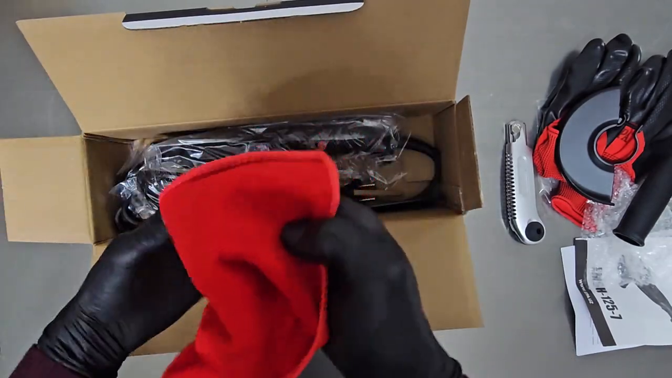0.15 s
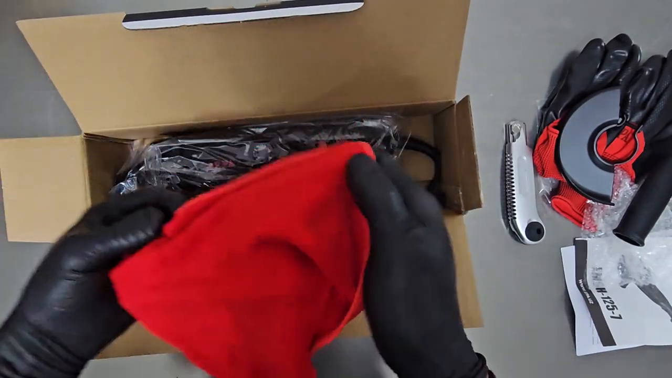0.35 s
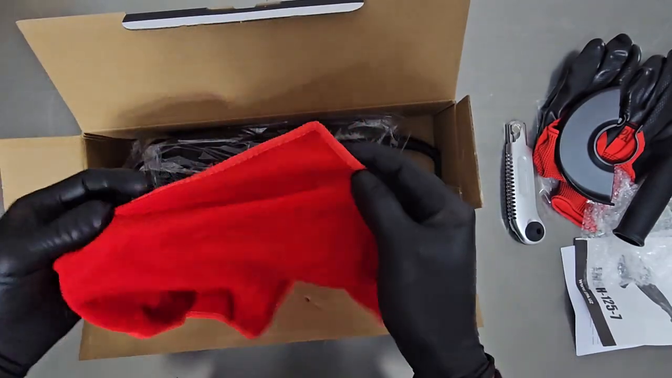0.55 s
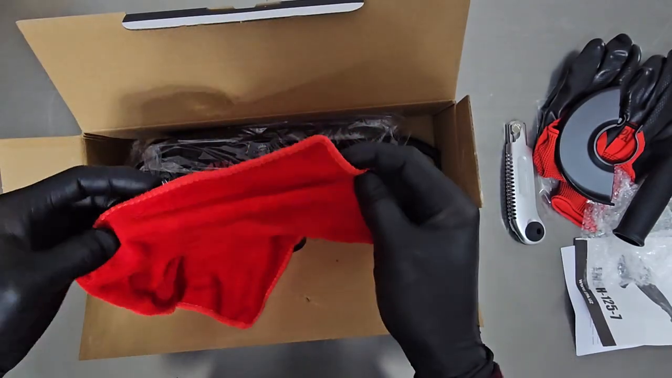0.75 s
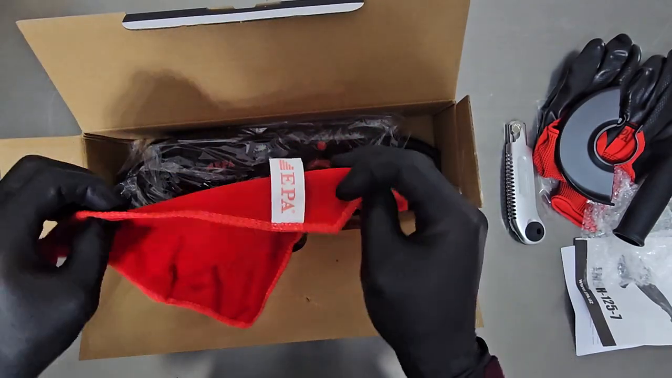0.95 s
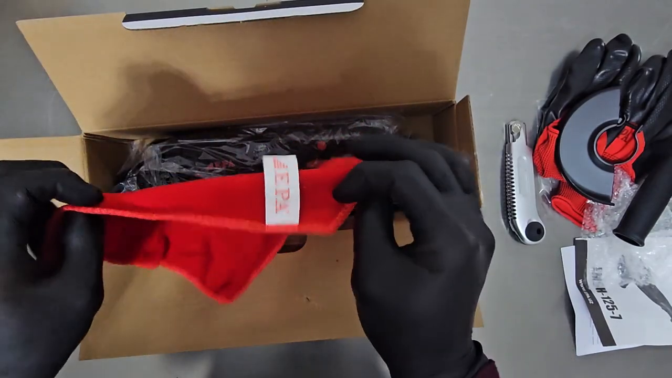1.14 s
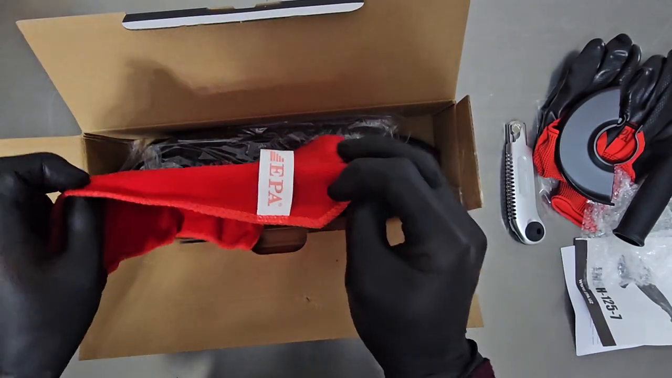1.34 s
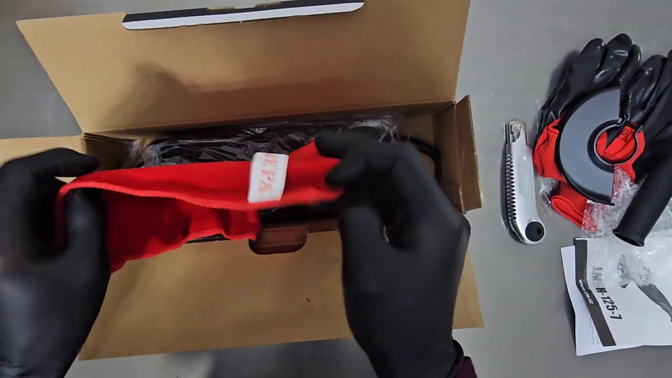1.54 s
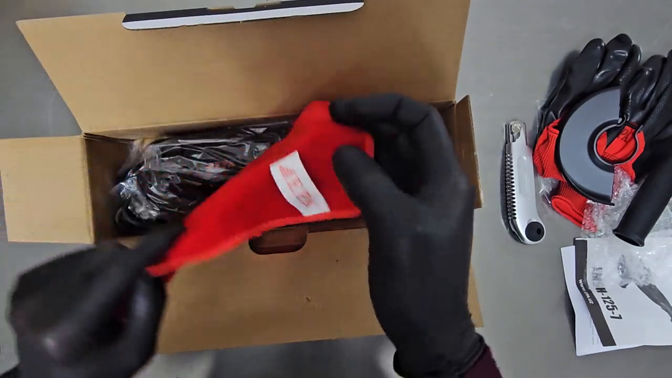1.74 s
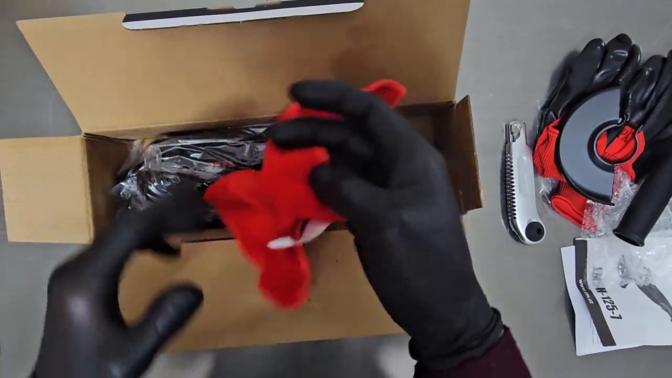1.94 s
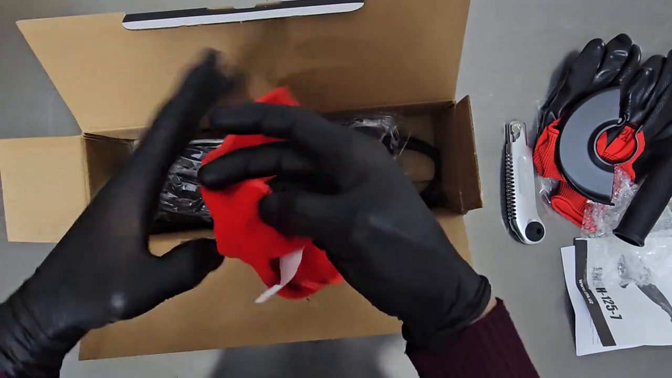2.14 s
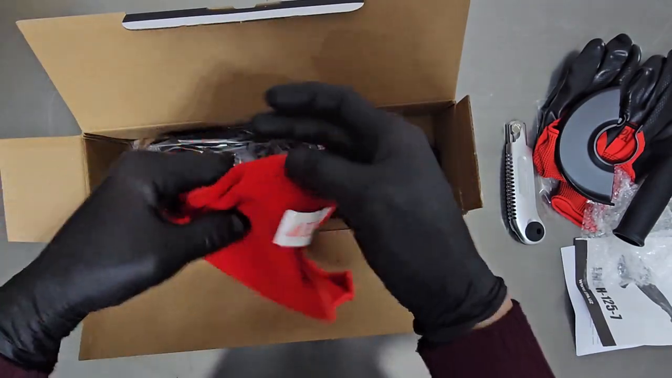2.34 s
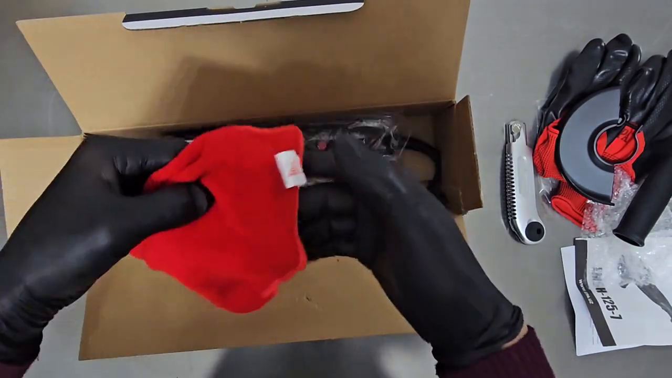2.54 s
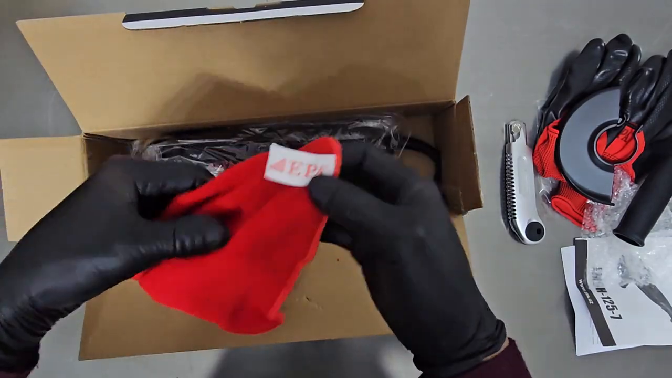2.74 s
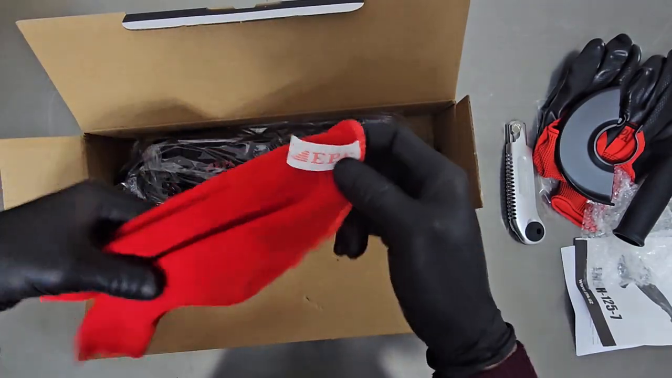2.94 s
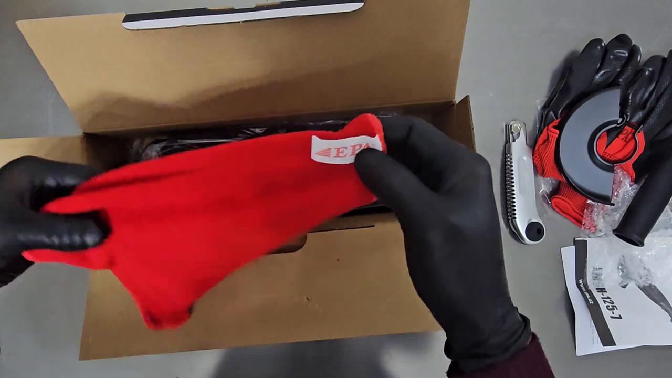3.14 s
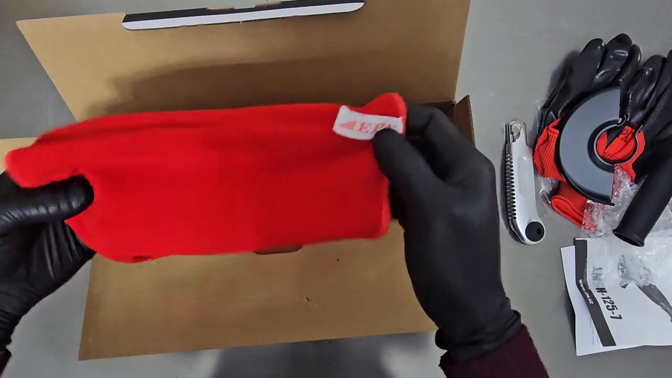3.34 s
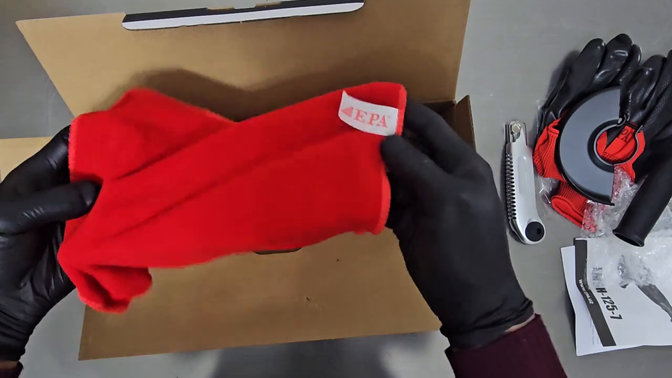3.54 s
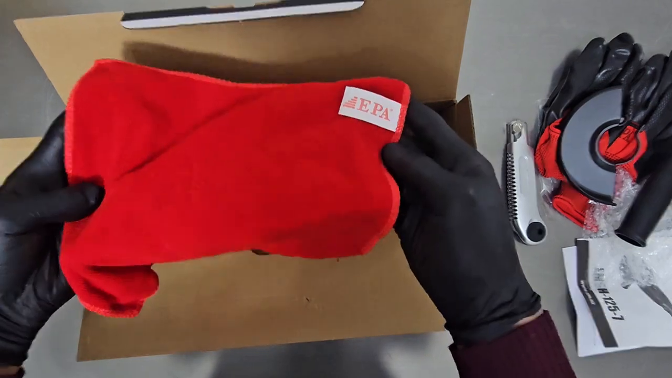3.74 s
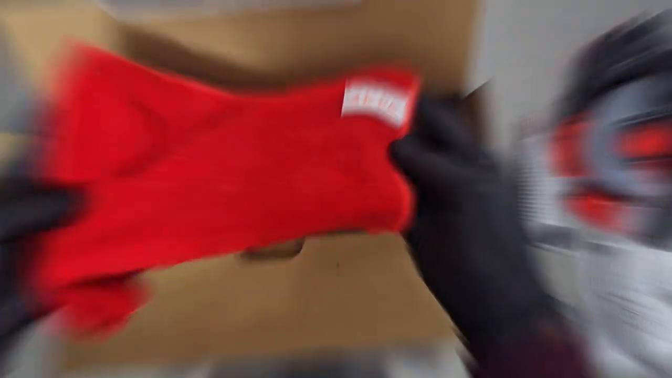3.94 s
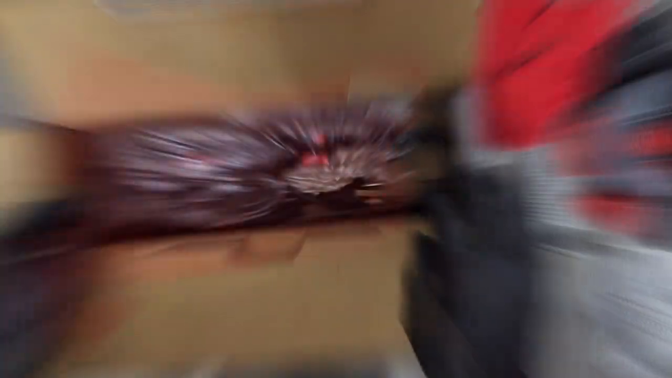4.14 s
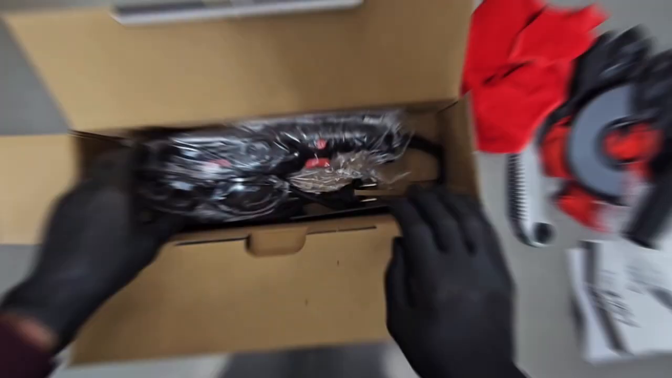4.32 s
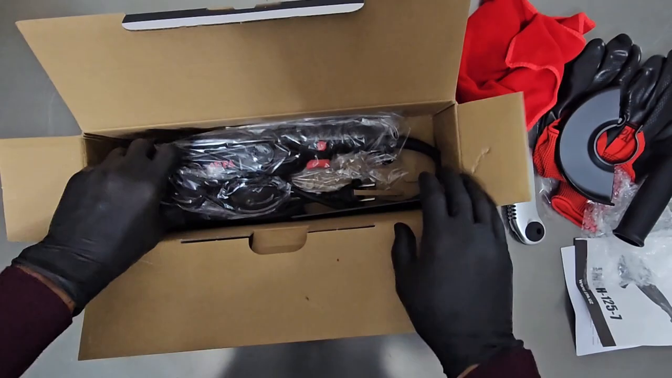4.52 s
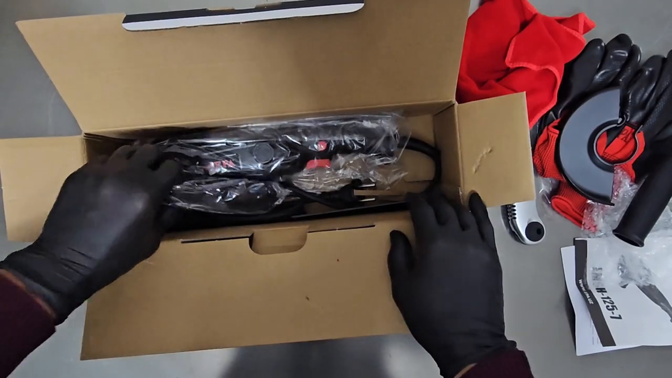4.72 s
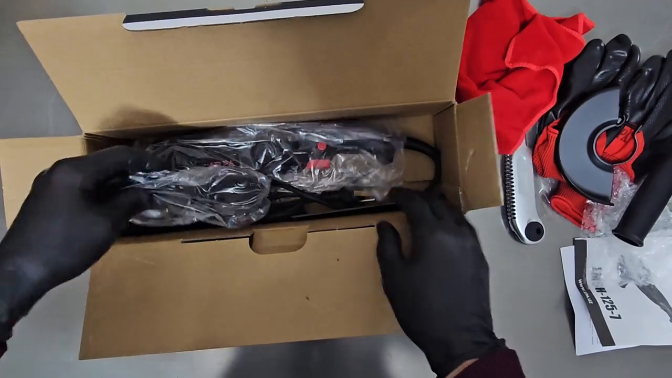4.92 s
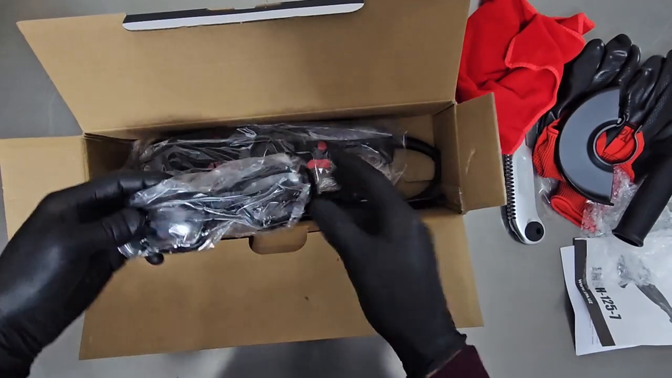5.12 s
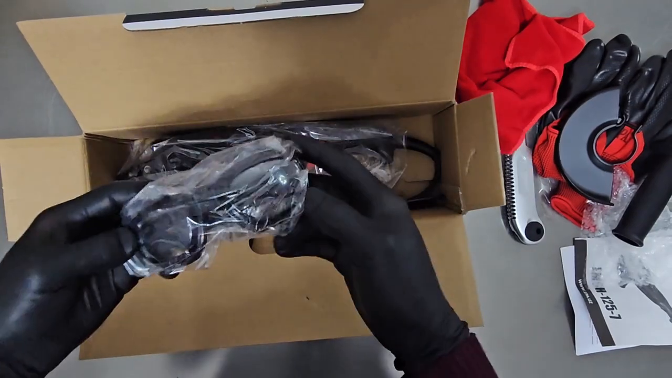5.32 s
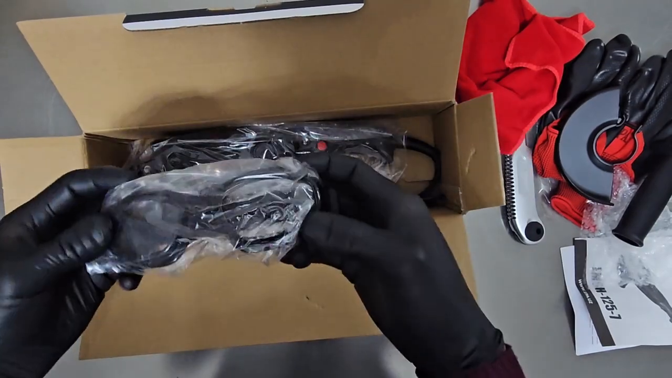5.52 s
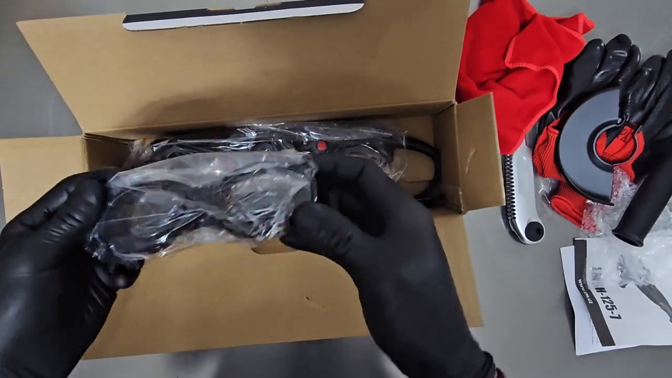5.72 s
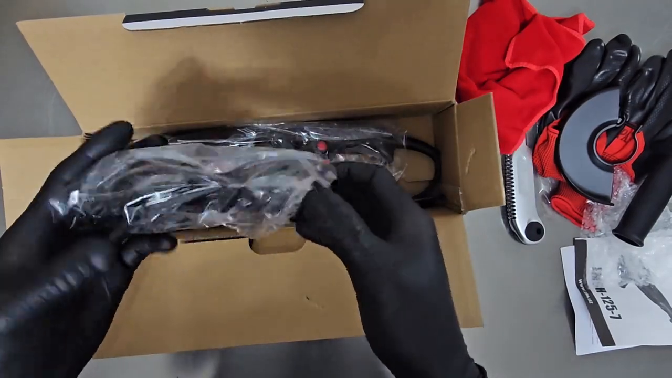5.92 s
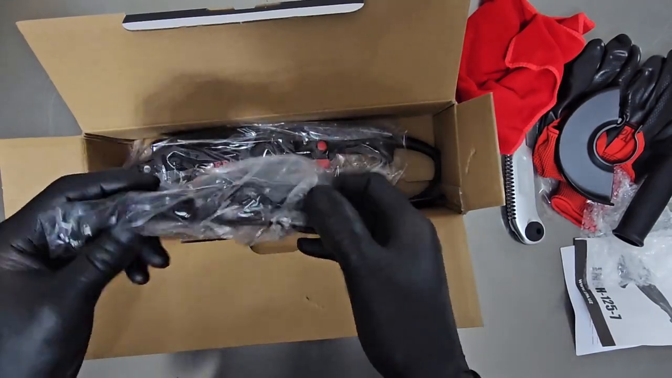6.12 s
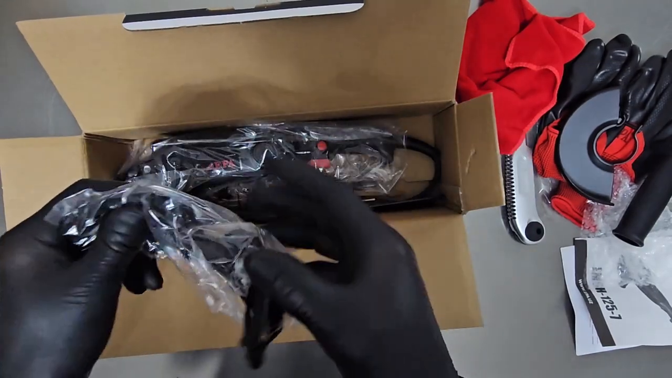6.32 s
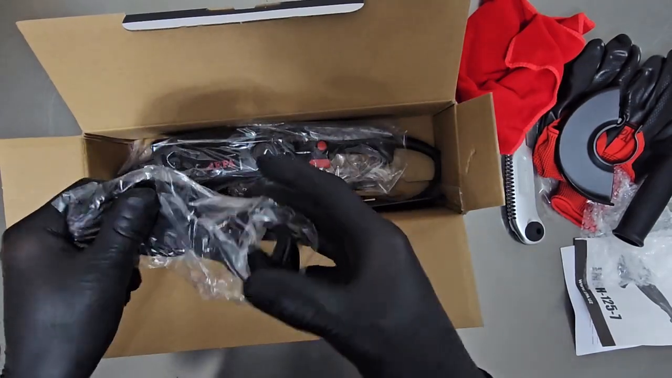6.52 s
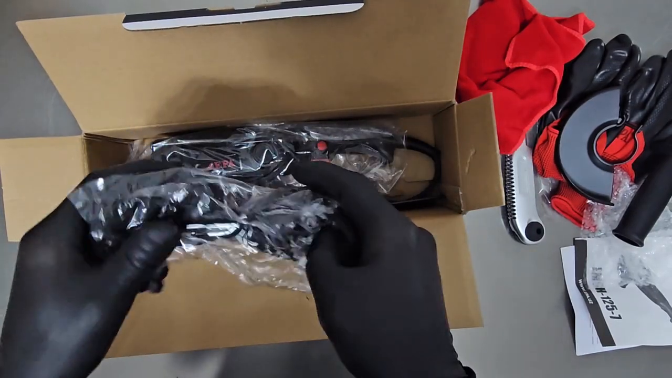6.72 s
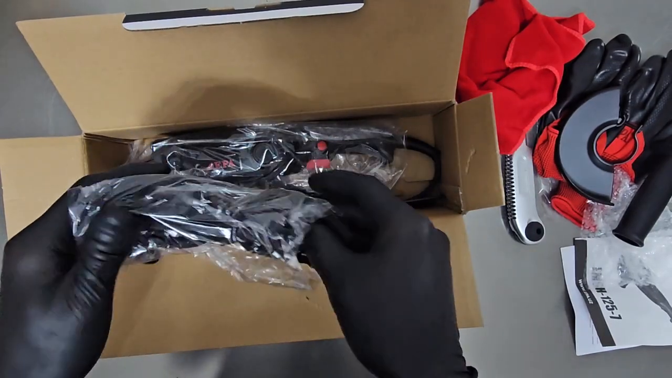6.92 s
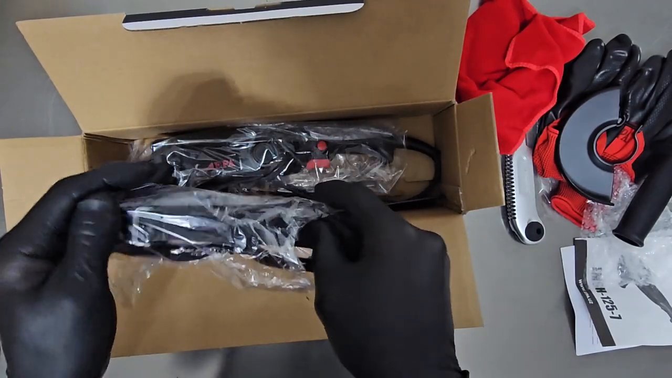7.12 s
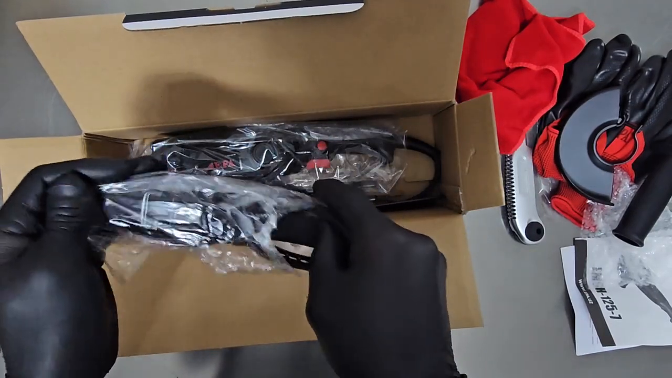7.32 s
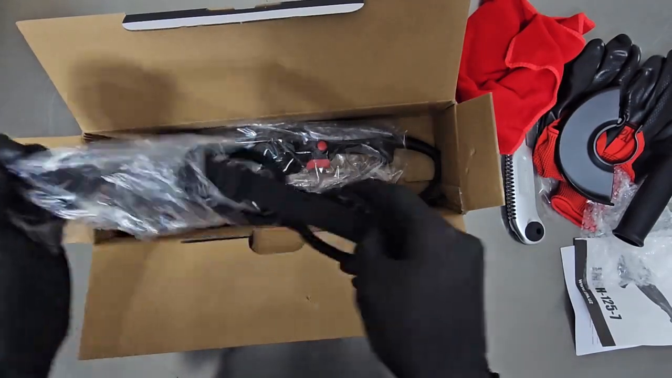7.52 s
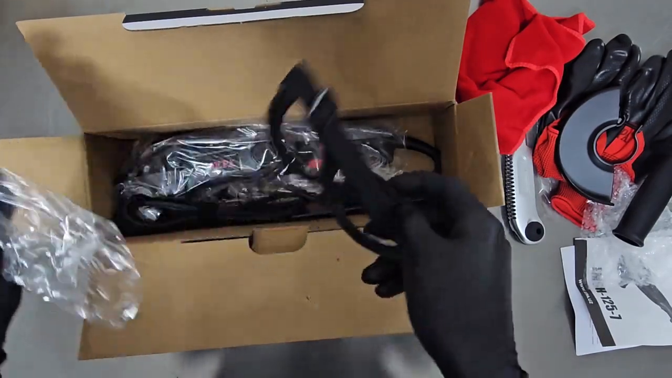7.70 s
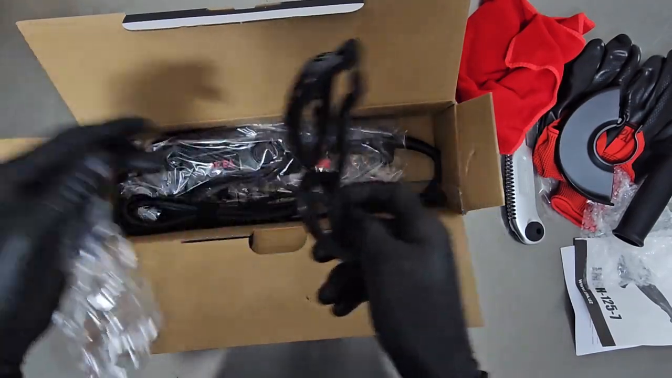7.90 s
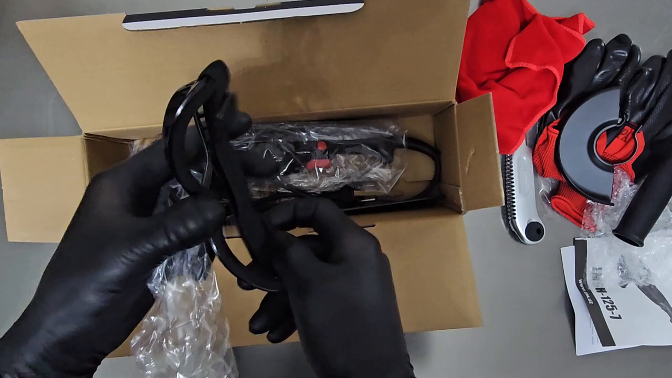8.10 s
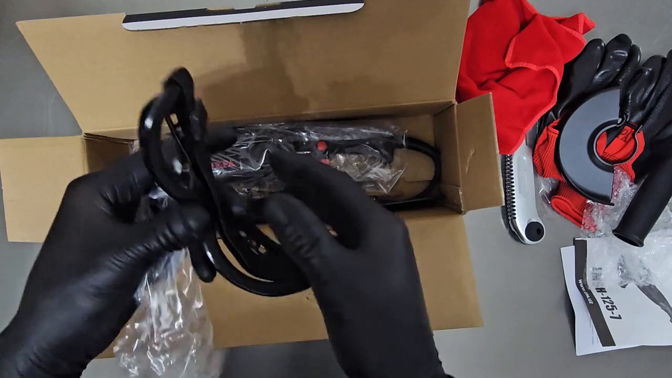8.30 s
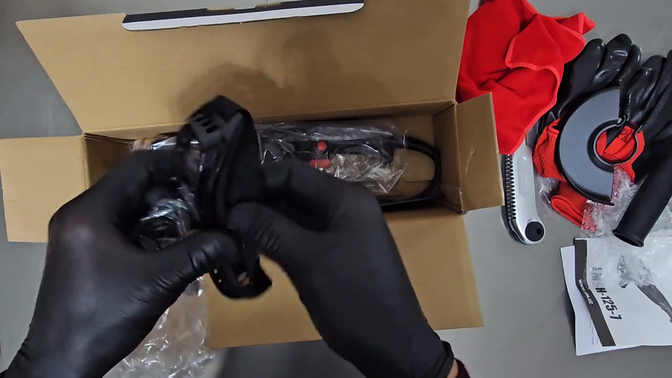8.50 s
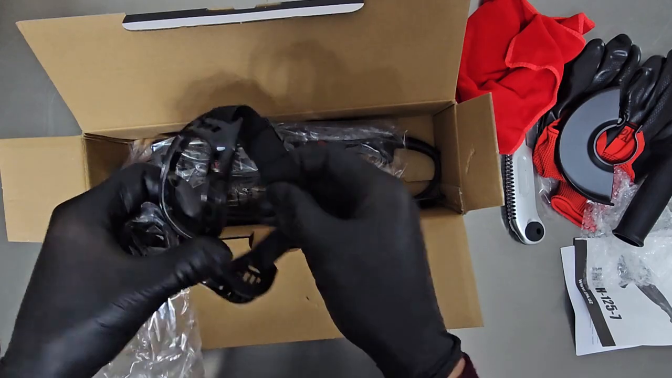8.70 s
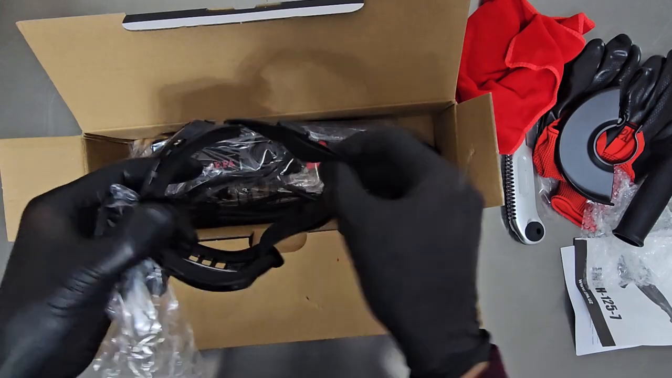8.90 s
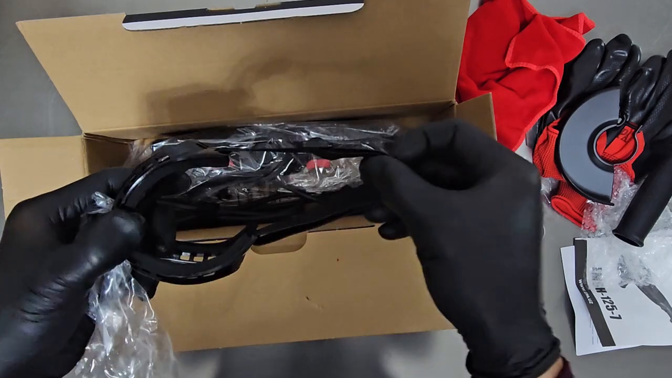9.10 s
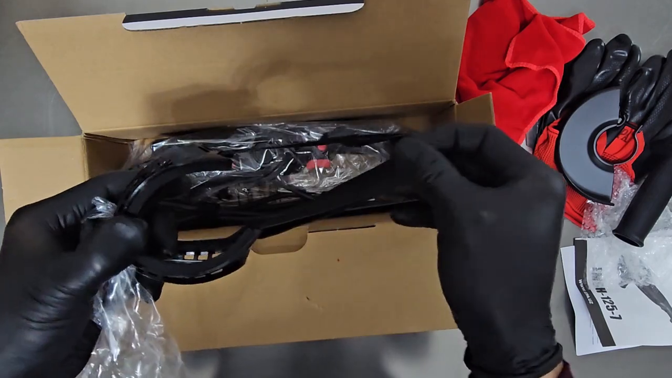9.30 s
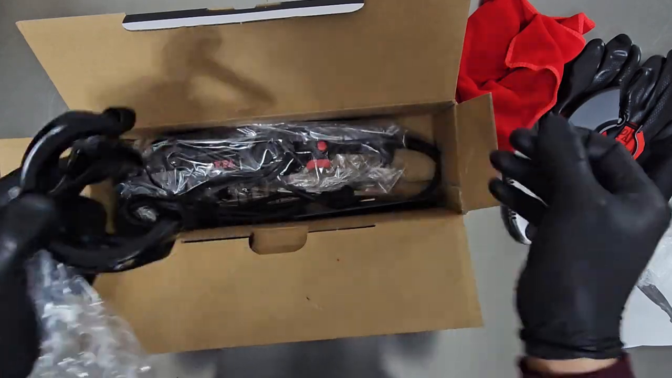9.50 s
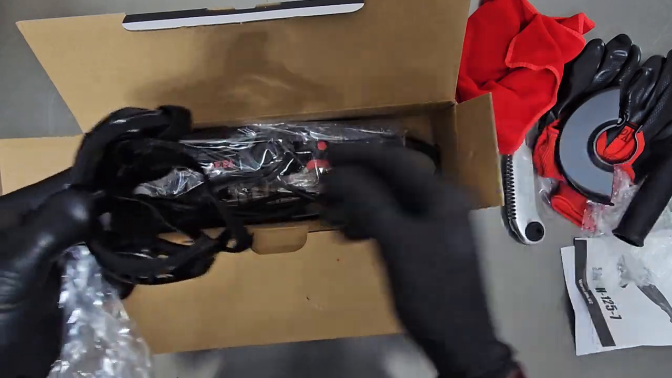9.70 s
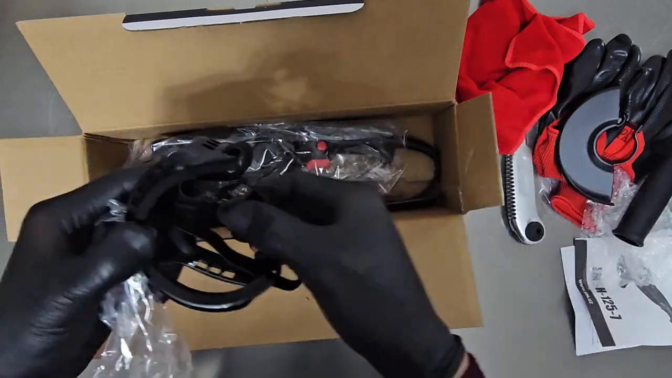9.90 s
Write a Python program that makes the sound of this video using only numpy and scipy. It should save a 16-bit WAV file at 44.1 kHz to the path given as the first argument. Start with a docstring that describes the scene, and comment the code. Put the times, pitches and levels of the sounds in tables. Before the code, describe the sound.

Close in a small quiet room, gloved hands brush and unfold a soft cloth with faint fibre hiss and dull rubs, bumping a cardboard box. Two stronger hollow knocks come as the cloth is put down. Then a thin plastic bag crinkles and snaps, growing denser and louder until the goggles are pulled free. Bare goggles tick and click lightly, fading to near silence. The pickup is bright, thin and stereo.

```python
"""A small room, heard by a close stereo camera whose microphone ports ring in the upper mids and shed the bass.
Gloved hands unfold a cloth over a cardboard box (fibre hiss and dull rub) and bump it (ringing panels).
They pull safety goggles from a thin plastic bag: its film buckles in avalanches of tiny noise swells
and its big creases snap. The bare goggles click as they are turned over: short rings with slip chatter."""
import sys
import numpy as np
from scipy import signal
from scipy.fft import rfft, irfft, next_fast_len
from scipy.io import wavfile
from scipy.ndimage import uniform_filter1d

SR = 44100
rng = np.random.default_rng(int(sys.argv[2]) if len(sys.argv) > 2 else 0)


def output_pcm(signal):
    """Save a mono or channel-first signal as 16-bit PCM at the path in sys.argv[1].

    Samples are clipped to [-1, 1] before scaling.
    """
    pcm = np.clip(np.atleast_2d(signal).T, -1, 1) * 32767
    wavfile.write(sys.argv[1], SR, np.round(pcm).astype(np.int16))


N = 438778
T = np.arange(N) / SR
TOP_HZ = 16000


def undb(db):
    """Amplitude ratio of a level in dB."""
    return 10 ** (np.asarray(db) / 20)


def convolve(x, response):
    """Sound through an impulse response, per channel."""
    return signal.oaconvolve(np.atleast_2d(x), np.atleast_2d(response), axes=1)[:, :N]


def colour(x, points, size=4096):
    """Minimum-phase filter of unit energy from (hz, level_db) points."""
    hz, level_db = np.transpose(points)
    bin_hz = np.arange(size // 2 + 1) * SR / size
    gain = undb(np.interp(np.log(bin_hz + 1), np.log(hz), level_db))
    cepstrum = irfft(np.log(gain))[:size // 2]
    cepstrum[1:] *= 2  # fold to causal
    response = irfft(np.exp(rfft(cepstrum, size)))
    return convolve(x, response / np.linalg.norm(response))


def band(x, hz, kind, order=2):
    """Butterworth filter."""
    sos = signal.butter(order, np.minimum(hz, SR / 2 - 1), kind, fs=SR, output="sos")
    return signal.sosfilt(sos, x)


def walk(rate_hz):
    """Random course through rate_hz normal draws a second, joined by straight lines."""
    knots = rng.standard_normal(size=8192)
    return np.interp(T * rate_hz, np.arange(len(knots)), knots)


def even(x, size=2400):
    """Hold the short-term power of the channel mean near 1, so that the hand's effort sets the level."""
    power = uniform_filter1d(x.mean(axis=0) ** 2, size)
    return x / np.sqrt(power + 1e-12)


def add(out, start_s, sound, pan_db=0, lag_samples=0):
    """Put in a sound; it reaches the right port lag_samples after the left."""
    first = int(start_s * SR)
    for ear, start, db in zip(out, (first, first + lag_samples), (pan_db, -pan_db)):
        part = sound[:max(N - start, 0)]
        ear[start:start + len(part)] += undb(db / 2) * part


def gestures(rows, attack_s, release_s):
    """Gain of (start_s, length_s, level_db) hand movements: build up, hold, die away; overlaps add in power."""
    power = np.zeros(N)
    for start_s, length_s, level_db in rows:
        stop_s = start_s + length_s + 10 * release_s
        span = slice(max(int(start_s * SR), 0), int(stop_s * SR))
        t = T[span] - start_s
        attack = np.minimum(t / attack_s, 1)
        release = np.exp(-np.maximum(t - length_s, 0) / release_s)
        power[span] += (undb(level_db) * attack * release) ** 2
    return np.sqrt(power)


def grains(rate_hz, spread_db, bunching, tint_db=2.5, low_s=0.0019, high_s=0.00087):
    """Tiny buckles in avalanches: brief swells, each of its own size and colour, shorter in the treble."""
    avalanche = .8 * walk(170) + .6 * walk(45)
    at = np.flatnonzero(rng.random(N) < rate_hz / SR * np.exp(bunching * avalanche))
    size_db = spread_db * np.minimum(rng.standard_normal(len(at)), 1.4)
    edges_hz = [20, 1000, 2000, 3600, 5000, 9000, 20000]
    swells_s = np.geomspace(low_s, high_s, len(edges_hz) - 1)
    out = 0
    for low_hz, high_hz, swell_s in zip(edges_hz, edges_hz[1:], swells_s):
        alike = 1 / (1 + (high_hz / 2400) ** 4)  # long waves reach both ports alike
        tint, side_db = np.clip(rng.standard_normal((2, len(at))), -2, 2)
        level_db = size_db + tint_db * tint
        power = np.array([np.bincount(at, undb(level_db + ear * side_db) ** 2, N) for ear in (1, -1)])
        pole = np.exp(-2 / swell_s / SR)
        burst = np.sqrt(signal.lfilter([1], np.poly([pole, pole]), power + 1e-12)) / swell_s
        shared = np.sqrt(alike) * rng.standard_normal(N)
        noise = shared + np.sqrt(1 - alike) * rng.standard_normal((2, N))
        out = -out + band(burst * noise, [low_hz, high_hz], "bandpass")  # neighbours alternate in sign
    return out


def reshape(x, rate_hz, depth_db, count=12):
    """A surface changes shape as it is handled: its resonances swell and fade, each on its own."""
    size = next_fast_len(N)
    spectrum = rfft(x, size)
    bin_hz = np.arange(size // 2 + 1) * SR / size
    place = np.interp(np.log(bin_hz + 1), np.log([500, TOP_HZ]), [0, count - 1])
    out = 0
    for k in range(count):
        weight = np.maximum(1 - np.abs(place - k), 0)  # triangular band
        out = out + irfft(spectrum * weight, size)[:, :N] * undb(depth_db * walk(rate_hz))
    return out


# spectrum of the room air: hz, level_db
AIR_SPECTRUM = [(550, 9), (1000, -6.5), (15000, -13)]


def room_air():
    """Faint steady noise, independent in each channel."""
    return undb(-63.5) * colour(rng.standard_normal((2, N)), AIR_SPECTRUM)


# spectrum of the fibre hiss: hz, level_db
WEAVE_SPECTRUM = [(300, -17), (3500, -11), (6500, -3.5), (9000, -6), (15000, -4.5)]
# spectrum of the duller rub: hz, level_db
RUB_SPECTRUM = [(550, 7.5), (900, 1.5), (1250, 5), (2400, -8.5), (4100, -3.5), (7000, -14)]
# strokes of the gloves over the cloth: start_s, length_s, hiss_db, rub_db
STROKES = [(0.287, 0.053, -67, -57.5), (0.577, 0.18, -56, -57), (0.9, 0.065, -55, -72),
           (1.105, 0.12, -61, -56.5), (1.562, 0.092, -56.5, -63), (1.748, 0.18, -80, -55),
           (2.233, 0.21, -66, -64.5), (2.466, 0.08, -55, -49), (2.714, 0.28, -57, -58),
           (2.994, 0.39, -55, -69), (3.514, 0.17, -59, -64.5), (3.948, 0.039, -73.5, -33.5),
           (4.168, 0.053, -74, -48)]
STROKE_ATTACK_S, STROKE_RELEASE_S = 0.041, 0.016
RESTING_HISS_DB, RESTING_RUB_DB = -70, -66.5  # the held cloth never lies quite still


def cloth(slips, scratch_db=3):
    """Fibres catch in fine scratches at each stroke; pressing harder adds a duller rub."""
    start_s, length_s, hiss_db, rub_db = np.transpose(STROKES)
    in_hand = T < SQUEEZES[0][0]  # until the hands take up the bag
    hiss = gestures(zip(start_s, length_s, hiss_db), STROKE_ATTACK_S, STROKE_RELEASE_S)
    hiss = np.hypot(hiss, undb(RESTING_HISS_DB) * in_hand)
    rub = gestures(zip(start_s, length_s, rub_db), STROKE_ATTACK_S, STROKE_RELEASE_S)
    rub = np.hypot(rub, undb(RESTING_RUB_DB) * in_hand)
    folds = reshape(even(slips, size=300), rate_hz=12, depth_db=4.5, count=24)
    scratches = colour(folds, WEAVE_SPECTRUM) * undb(scratch_db * walk(200))
    return hiss * even(scratches) + rub * even(colour(folds, RUB_SPECTRUM))


# cardboard panel modes: hz, level_db, t60_s
BOX_MODES = [(401.5, -2, 0.12), (483.5, -4.5, 0.19), (549.6, -3.5, 0.2), (612, -2.5, 0.14),
             (658, -4, 0.099), (822, -6, 0.09), (898, 0, 0.048), (1370, -9, 0.037), (3360, -15.5, 0.045)]
# bumps on the box, from the hands and from the bag as it is lifted out: start_s, level_db, rasp_db
KNOCKS = [(0.155, -21, -12.5), (0.46, -43.5, -14), (0.665, -33, -19), (1.987, -36, -11), (2.026, -40, -1),
          (2.311, -38.5, -33), (2.511, -40.5, -19), (2.837, -39.5, -33), (3.169, -42, -28),
          (3.929, -16.5, -12.5), (3.979, -19.5, -25), (4.18, -38, -20), (4.555, -24.5, -33),
          (4.705, -27, -42), (4.972, -29, -37), (9.478, -31.5, -14)]
CONTACT_S = 0.000097  # build-up when rasp_db is 0; softer blows take longer


def knocks():
    """A soft blow sets the box panels ringing, with a short contact rasp and a hollow shudder after it."""
    out, t = np.zeros((2, N)), np.arange(16384) / SR
    hz, mode_db, t60_s = np.transpose(BOX_MODES)[:, :, None]
    for start_s, level_db, rasp_db in KNOCKS:
        detune, strength, phase = rng.standard_normal((3, len(BOX_MODES), 1))
        decay = undb(mode_db + 2 * strength - 60 * t / t60_s)
        modes = decay * np.sin(2 * np.pi * hz * (1 + 0.012 * detune) * t + np.pi * phase)
        push = 1 - np.exp(-t / (CONTACT_S * undb(-rasp_db)))
        panels = modes.sum(axis=0) * push
        panels = panels / np.abs(panels).max()
        rasp = rng.standard_normal(len(t)) * np.exp(-t / 0.0097)
        rasp = undb(rasp_db) * band(rasp, 2300, "lowpass", order=1)
        shudder = band(rng.standard_normal(len(t)), [450, 900], "bandpass") * push * np.exp(-t / 0.038)
        add(out, start_s, undb(level_db) * (panels + rasp + undb(-5) * shudder))
    return out


# short slides of cloth, film or strap: centre_s, level_db, spread_s
SCUFFS = [(2.844, -39, 0.0015), (3.985, -33, 0.0037), (5.45, -30.5, 0.0096), (7.425, -13, 0.00094),
          (7.47, -29, 0.0015), (9.395, -44.5, 0.0045), (9.487, -27, 0.0099)]
CLICK_RUB_DB, CLICK_RUB_S = -27.5, 0.0028  # rub around a click: level against the click, spread


def scuffs(slips):
    """A slide is a quick swell of stick-slip grains; the goggle frame also rubs briefly around each click."""
    rubs = [(s + CLICK_RUB_S / 2, db + CLICK_RUB_DB, CLICK_RUB_S) for s, db, _, _ in CLICKS]
    gain = np.zeros(N)
    for centre_s, level_db, spread_s in [*SCUFFS, *rubs]:
        span = slice(int((centre_s - 10 * spread_s) * SR), int((centre_s + 10 * spread_s) * SR))
        gain[span] += undb(level_db) * np.exp(-((T[span] - centre_s) / spread_s) ** 2 / 2)
    return slips * gain


# squeezes and pulls of the bag: start_s, length_s, crinkle_db, flex_db (whole sheet, against the crinkle)
SQUEEZES = [(4.364, 0.1163, -39, 1), (4.518, 0.0748, -33, 0), (4.589, 0.099, -27, -3),
            (4.683, 0.13, -32, -4.5), (4.795, .225, -28, -7), (5.117, 0.1007, -36.5, -17),
            (5.245, 0.111, -32, -14), (5.432, .12, -33.5, -14), (5.541, .095, -25.5, -9),
            (5.675, .08, -24.5, -8), (5.829, .29, -27.5, -10.5), (6.121, .1, -24.5, -11.5),
            (6.23, .24, -27.5, -14), (6.498, 0.1186, -35, -17), (6.615, .41, -24.5, -11),
            (7.03, 0.13, -27, -10.5), (7.152, .29, -25, -11.5), (7.445, .215, -21, -6.5),
            (7.68, .15, -29.5, -14)]
SQUEEZE_ATTACK_S, SQUEEZE_RELEASE_S = .035, .035
FIRM_GRIP_DB = -26  # effort that adds 850 to the buckling rate
# bag and goggles shifting in the hands: start_s, length_s, rustle_db
SHIFTS = [(7.97, 0.073, -46.5), (8.13, 0.065, -42), (8.39, 0.18, -44.5), (8.65, 0.041, -36),
          (8.75, 0.1, -50), (8.91, 0.035, -40), (8.99, 0.12, -51), (9.465, 0.016, -49)]
SHIFT_ATTACK_S, SHIFT_RELEASE_S = 0.0096, 0.046
HOLDING_DB, BAG_OFF_S = -63.5, 9.5  # faint rustle of the empty bag in the hand


def bag(slips):
    """Harder work buckles more creases a second; film slides dully on film; the sheet radiates the low mids."""
    start_s, length_s, crinkle_db, flex_db = np.transpose(SQUEEZES)
    effort = gestures(zip(start_s, length_s, crinkle_db), SQUEEZE_ATTACK_S, SQUEEZE_RELEASE_S)
    flex = gestures(zip(start_s, length_s, crinkle_db + flex_db), SQUEEZE_ATTACK_S, SQUEEZE_RELEASE_S)
    shifting = gestures(SHIFTS, SHIFT_ATTACK_S, SHIFT_RELEASE_S)
    held = np.hypot(shifting, undb(HOLDING_DB) * (T > BAG_OFF_S))
    rate_hz = 190 + 850 * effort / undb(FIRM_GRIP_DB)  # before bunching
    creases = reshape(grains(rate_hz, spread_db=4, bunching=.65), rate_hz=40, depth_db=3.5)
    sheet = even(band(creases, 1510, "lowpass"))
    film = even(band(creases, 900, "highpass", order=1))
    sliding = band(slips, [1200, 6500], "bandpass", order=1)
    worked = effort * (film + undb(-4.5) * sliding)
    rustle = held * (film + undb(-7) * sliding)
    return worked + flex * sheet + rustle


def tick(out, start_s, level_db, treble_db, body_db, ring_hz, ring_s, chatter_s, body_hz=1900, rise_s=0.00037):
    """A sudden release: a brief ring, a lower body note that differs each time, a chatter of small slips."""
    t = np.arange(512) / SR
    slips = rng.standard_normal(len(t)) * (t * np.exp(-2 * t / chatter_s)) ** 2
    crack = band(slips / np.linalg.norm(slips), 7000, "highpass")
    ring = np.sin(2 * np.pi * ring_hz * np.exp(0.1 * rng.standard_normal()) * t)
    body = undb(body_db) * np.sin(2 * np.pi * body_hz * np.exp(0.29 * rng.standard_normal()) * t)
    tone = (ring + body) * np.exp(-t / ring_s) * (1 - np.exp(-t / rise_s))
    sound = tone / np.linalg.norm(tone) + undb(treble_db) * crack
    add(out, start_s, undb(level_db) * sound, pan_db=rng.standard_normal(), lag_samples=rng.integers(-2, 3))


# big creases popping through: start_s, level_db
SNAPS = [(4.4363, -10), (4.6207, -8.5), (5.083, -16.5), (5.155, -15.5), (5.201, -19), (5.22, -15),
         (5.26, -11), (5.3273, -7), (5.355, -11), (5.4144, -11), (5.452, -8), (5.464, -10), (5.673, -4.5),
         (5.9219, -5), (6.0427, -4), (6.3226, -9), (6.409, -9), (6.4497, -7), (6.558, -8), (6.5875, -9),
         (6.7502, -5), (7.007, -3.5), (7.2425, -3), (7.3582, 0), (7.401, -3.5), (7.4704, 0), (7.628, -1.5),
         (9.602, -32.5)]
# goggle frame and strap clicking: start_s, level_db, treble_db, body_db (lower note)
CLICKS = [(7.911, -11, 11, -5.5), (7.9618, -18.5, 11, -9), (8, -16.5, -12, 2), (8.0683, -13.5, 6, 5.5),
          (8.1248, -22.5, 18, -16), (8.1818, -8, 4.5, 6), (8.2601, -17.5, -13, 3.5), (8.334, -14.5, 0, 3),
          (8.355, -12.5, 0, 4), (8.433, -23, 21, -11), (8.4726, -17.5, 4, -13), (8.531, -20, -4, -19),
          (8.6472, -7.5, 9, -6), (8.656, -14, 2, -5), (8.686, -9, 10, -15), (8.848, -14.5, 5, -11),
          (8.9, -20, -6, 3), (8.935, -14, 16, 0), (9.0365, -32, 25, -4), (9.0627, -22.5, 11, -15),
          (9.132, -34, 27.5, -6), (9.178, -38, 29.5, -6), (9.227, -20, 5.5, 2), (9.261, -22.5, 8, 1),
          (9.3268, -19.5, 0, -11), (9.3965, -15.5, 2, -24), (9.429, -24, -10, -19), (9.633, -33, 23, -1)]


def ticks():
    """Creases of the bag pop through; the stiffer goggle frame clicks."""
    out = np.zeros((2, N))
    for start_s, level_db in SNAPS:
        treble_db = 11.5 + 2 * rng.standard_normal()
        tick(out, start_s, level_db, treble_db, body_db=-2.5, ring_hz=3320, ring_s=0.00012, chatter_s=0.0012)
    for start_s, level_db, treble_db, body_db in CLICKS:
        tick(out, start_s, level_db, treble_db, body_db, ring_hz=3880, ring_s=0.00037, chatter_s=0.0014)
    return out


def room(x, low_t60_s=0.48, high_t60_s=0.2, wet_db=-14, near_db=-15, near_s=0.058):
    """Quick scatter from box and table, then the room's tail, longer in the lows."""
    t = np.arange(SR // 2) / SR
    near, far = rng.standard_normal((2, 2, len(t)))
    near = band(near, 5300, "lowpass", order=1) * np.exp(-t / near_s) * (t > .001)
    lows = band(far + .5 * far[::-1], 1240, "lowpass") * undb(-60 * t / low_t60_s)  # channels partly shared
    highs = band(far, 1700, "highpass") * undb(-60 * t / high_t60_s)
    tail = (lows + highs) * (t > .006)
    scatter = undb(near_db) * near / np.linalg.norm(near[0])
    return x + convolve(x, scatter + undb(wet_db) * tail / np.linalg.norm(tail[0]))


def scene():
    """Cloth, bag and goggles lean left in the treble; with the knocks they excite the room; air is added."""
    slips = even(grains(3000, spread_db=2.0, bunching=.4))  # fine stick-slip of one surface over another
    handled = cloth(slips) + bag(slips) + scuffs(slips) + ticks()
    lean_db = 1.58  # hands a little to the left; the camera body shades only the shorter waves
    lean = undb([[lean_db], [-lean_db]]) - 1
    handled = handled + lean * band(handled, 1000, "highpass", order=1)
    air = room_air()
    return room(handled + knocks()) + air


# microphone response: hz, level_db
MIC_RESPONSE = [(200, -40), (290, -30.5), (400, -16.5), (520, 0), (820, 0), (1080, -5), (1400, -1),
                (1700, -1.5), (2100, 2.5), (2650, -1.5), (3200, 7.5), (3700, 17), (4300, 3.5), (5500, -2.5),
                (10000, -6.5), (11600, -2), (13000, -4), (16000, -6.5)]


def record(dry):
    """The ports ring and shed the bass; the loudest peaks are rounded a little and the top is cut."""
    rounded = np.tanh(.5 * colour(dry, MIC_RESPONSE)) / .5
    top_cut = signal.ellip(8, .2, 70, TOP_HZ, fs=SR, output="sos")
    return signal.sosfilt(top_cut, rounded)


dry = scene()
out = record(dry)
output_pcm(out)
```